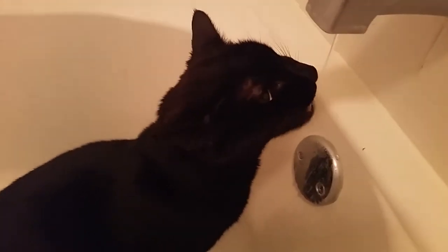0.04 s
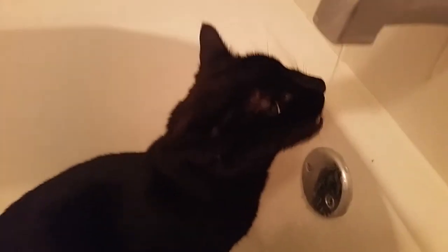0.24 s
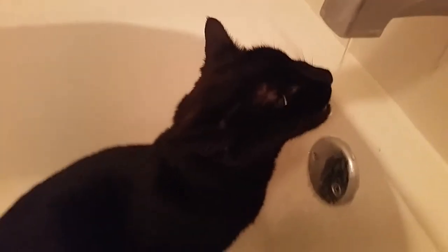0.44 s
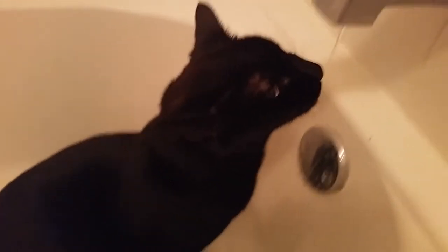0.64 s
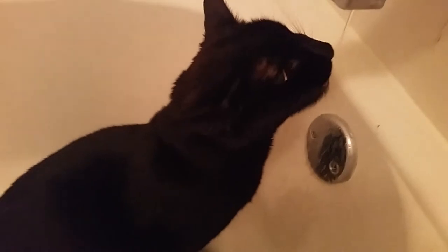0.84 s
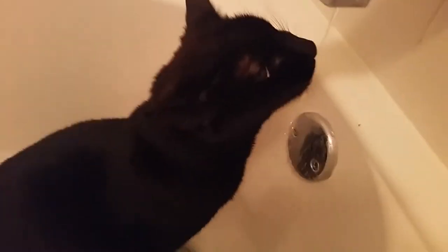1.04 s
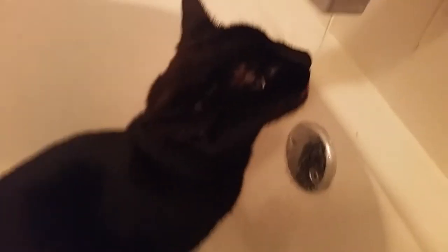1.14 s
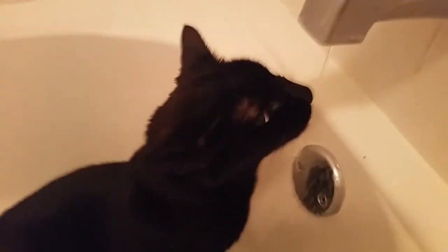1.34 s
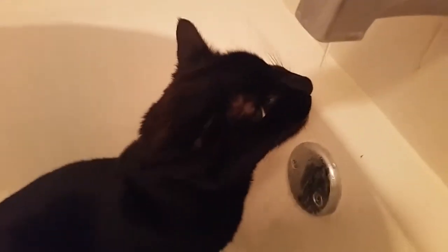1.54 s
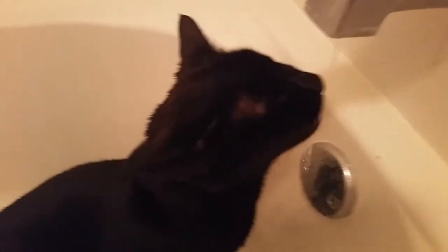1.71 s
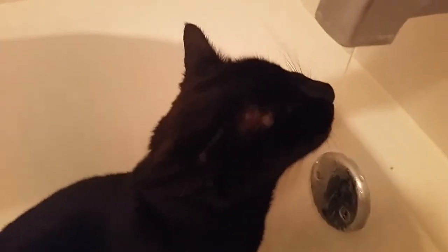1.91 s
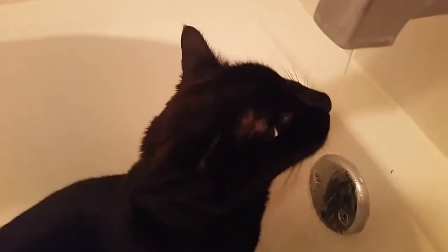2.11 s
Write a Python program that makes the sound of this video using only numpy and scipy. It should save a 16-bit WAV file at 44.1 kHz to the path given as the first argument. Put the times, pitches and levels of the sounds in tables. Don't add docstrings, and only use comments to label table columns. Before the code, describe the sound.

A cat's tongue laps at a thin trickle in a bathroom, amid heavy handling thumps and scrapes

```python
import sys
import numpy as np
from scipy import signal
from scipy.fft import rfft, irfft
from scipy.io import wavfile
from scipy.ndimage import uniform_filter1d

SR = 44100
rng = np.random.default_rng(int(sys.argv[2]) if len(sys.argv) > 2 else 0)


def volts(x):
    e = np.asarray(x, float) / 20
    return 10 ** e


def wav_out(sig):
    wavfile.write(sys.argv[1], SR, np.round(np.clip(np.atleast_2d(sig).T, -1, 1) * 32767).astype(np.int16))


N = 97020


def evened(x):
    return x / np.sqrt(np.mean(x ** 2) + 1e-20)


def read(points, hz):
    f, value = np.transpose(points)
    return np.interp(np.log(hz + 1), np.log(f + 1), value)


def add(mix, s, sound):
    part = mix[..., round(s * SR):][..., :sound.shape[-1]]
    part += sound[..., :part.shape[-1]]


def colour(x, points):
    hz = np.fft.rfftfreq(len(x), 1 / SR)
    return irfft(rfft(x) * volts(read(points, hz)), len(x))


def sides(pan_db):
    return volts(np.array([[pan_db / 2], [-pan_db / 2]]))


def ports(x):
    # hz, level_db
    left_colour = [(2000, -5.5), (3600, -13.5), (5200, -15.5), (7100, -3), (9400, -11.5), (11500, -9),
                   (14600, -13)]
    # hz, level_db
    right_colour = [(2000, -8), (3600, -11.5), (5200, -10), (7100, -6), (9400, -12), (12000, 1),
                    (14600, -13)]
    # hz, level_db
    treble_edge = [(14900, -45)]
    patch_db = 3.5
    left = colour(x[0], left_colour + treble_edge)
    right = colour(x[1], right_colour + treble_edge)
    z = signal.stft(np.array([left, right]), nperseg=256)[2]
    patches = uniform_filter1d(rng.standard_normal(z.shape[1:]), size=6, axis=0)
    patches = evened(uniform_filter1d(patches, size=9, axis=1))
    return signal.istft(z * volts(patch_db * patches), nperseg=256)[1][:, :N]


def floor():
    # hz, level_db (per Hz)
    tone_spectrum = [(24, -8.5), (40, 10.5), (82, 0), (961, -26), (1780, -36), (4000, -46), (5200, -84),
                     (8800, -120)]
    tone_db, tone_pan_db, trickle_db, waver_db = -48, 5, -61.5, 1.5
    raw = rng.standard_normal((6, N))
    waver = volts(waver_db * evened(uniform_filter1d(raw[2:4], size=2500, axis=1)))
    tone = evened(np.array([colour(raw[0], tone_spectrum), colour(raw[1], tone_spectrum)]))
    trickle = ports(raw[4:])
    return waver * (volts(tone_db) * sides(tone_pan_db) * tone + volts(trickle_db) * trickle)


def swishes():
    # start_s, length_s, level_db, pitch_hz, left_right_db
    brushes = [
        (0.048, 0.028, -53.5, 1270, 0),
        (0.425, 0.068, -55, 1770, 11),
        (0.84, 0.097, -53, 2200, 5),
        (0.96, 0.089, -58.5, 2640, -7),
        (0.76, .13, -56.5, 2260, 10.5),
        (1.5, .04, -64, 5600, 5),
        (1.5, 0.131, -67.5, 2200, 4),
        (2.052, 0.07, -57.5, 4400, 10),
    ]
    out = np.zeros((2, N))
    for s, length, db, hz, pan_db in brushes:
        t = np.arange(0, length, 1 / SR)
        peak = signal.iirpeak(hz, 2.25, SR)
        raw = rng.standard_normal((3, 6000))[:, :len(t)]
        hiss = raw[:2] + 0.18 * raw[2]
        hiss = evened(signal.lfilter(*peak, signal.lfilter(*peak, hiss)))
        swell = np.sin(np.pi * (t / length) ** 0.31)
        add(out, s, volts(db) * sides(pan_db) * swell * hiss)
    return out


def bathroom(x):
    # hz, t60_s
    tile_decay = [(3500, 0.47), (7000, 0.35), (13000, 0.24)]
    taps = rng.standard_normal((2, SR // 2)) * (np.arange(SR // 2) > 130)
    hz, t, z = signal.stft(taps, SR, nperseg=256)
    fall = volts(-60 * t / read(tile_decay, hz)[:, None])
    tail = signal.istft(z * fall, SR, nperseg=256)[1]
    return signal.fftconvolve(x, tail / np.linalg.norm(tail[0]), axes=1)[:, :N]


def spatter():
    # start_s, length_s, level_db, left_right_db
    bursts = [(0.069, 0.16, -58, 4), (0.837, 0.11, -59.5, 9), (0.257, 0.17, -56, 3), (0.413, 0.068, -53, 6),
              (0.461, 0.093, -50.5, 2), (0.524, 0.19, -54.5, -0.5), (0.663, 0.12, -56, 6.5),
              (0.956, 0.06, -52, 3.5), (0.981, 0.095, -48.5, 4), (1.07, 0.032, -45, -5),
              (1.135, 0.09, -50, 7), (1.162, 0.1, -49, -4), (1.267, 0.13, -51, -3),
              (1.342, 0.097, -51.5, 5.5), (1.677, 0.099, -55.5, -0.5), (1.852, 0.11, -59.5, 3),
              (2.039, 0.063, -54, 1.5)]
    drops_per_s, drop_spread_db, fall_db, mist_db = 480, 0.5, -14.5, 2
    rise_s, end_s = 0.012, 0.0048
    envelope = np.zeros((2, N))
    for s, length, db, pan_db in bursts:
        t = np.arange(0, length, 1 / SR)
        fade = np.clip(np.minimum(t / rise_s, (length - t) / end_s), 0, 1)
        add(envelope, s, sides(pan_db) * volts(db + fall_db * t / length) * fade)
    sizes = volts(drop_spread_db * np.minimum(rng.exponential(1, N), 4))
    drops = sizes * (rng.random(N) < drops_per_s / SR)
    drops = signal.lfilter([1], [1, -.9], drops) * rng.standard_normal((2, N))
    mist = rng.standard_normal((2, N))
    return ports(envelope * (evened(drops) + volts(mist_db) * mist)) * 2


def clicks():
    # start_s, peak_db, pitch_hz
    wet_clicks = [(0.0776, -36, 10860), (0.1303, -49, 3600), (0.2312, -51.5, 3540), (0.2708, -44, 6600),
                  (0.3445, -30.5, 11900), (0.4688, -44, 6740), (0.6752, -40, 6630), (0.8322, -42.5, 6600),
                  (0.9957, -32, 7100), (1.1738, -32.5, 6570), (1.3204, -27.5, 11700),
                  (1.3399, -32.5, 10400), (1.6602, -41, 12100), (1.687, -37, 7250), (1.924, -51.5, 3570),
                  (2.0108, -51, 3570), (2.0248, -49, 3400), (2.055, -48.5, 4840), (2.167, -54, 3460),
                  (.0468, -46, 12700), (.0772, -51.5, 3780), (.1325, -48.5, 7500), (0.9962, -30.5, 12000),
                  (.24, -46.5, 11000), (.298, -50, 11200), (.337, -44, 10400), (.4234, -39, 10500),
                  (.5307, -42, 7200), (.607, -57, 12100), (.636, -41, 11200), (.8609, -53, 3260),
                  (.9542, -43.5, 6700), (.9727, -44, 12100), (1.0794, -52, 11100), (1.5848, -55, 7250),
                  (1.651, -45, 12200), (1.6851, -37, 11300), (1.8687, -51, 5900), (1.888, -49, 5600),
                  (.9462, -48, 6830), (1.935, -49, 12400), (2.023, -49, 7200)]
    cycles, gain_db, tick_db, tick_s = 4.5, 3.5, -20, 0.0008
    right_above_hz = 9500
    out = np.zeros((2, N))
    for s, db, hz in wet_clicks:
        u = np.arange(0, 4 * cycles / hz, 1 / SR) * hz
        ring = np.sin(2 * np.pi * u * (1 + 0.0013 * u))
        bubble = np.minimum(u / 2, 1) * np.exp(-u / cycles) * ring
        n = min(len(u), 300)
        bubble[:n] += volts(tick_db) * rng.standard_normal(n) * np.exp(-np.arange(n) / (tick_s * SR))
        pan_db = np.clip((right_above_hz - hz) / 600, -5, 1)
        add(out, s, volts(db + gain_db) * sides(pan_db) * bubble)
    return out


def plops():
    # start_s, peak_db, pitch_hz, left_right_db; at 1.2487 s the case rings on the left with the snap
    dull_plops = [(0.049, -40.5, 1320, 6), (0.0784, -49, 1660, 5), (0.2391, -39.5, 543, 4),
                  (0.3459, -43, 573, 16), (0.678, -38.5, 1460, 4), (.9735, -38.5, 1470, 6),
                  (1.1455, -31.5, 636, 12.5), (1.2487, -27, 950, 18), (1.577, -51, 716, 12),
                  (1.6606, -43, 1350, 8), (1.6862, -45.5, 1370, 11), (1.709, -46.5, 770, 16),
                  (1.8424, -42.5, 527, -1), (1.89, -53, 2600, 4), (1.923, -46.5, 530, -3),
                  (2.0301, -45.5, 710, 4), (2.1645, -44.5, 487, -7)]
    cycles = 0.64
    out = np.zeros((2, N))
    for s, db, hz, pan_db in dull_plops:
        u = np.arange(0, 8 * cycles / hz, 1 / SR) * hz
        swell = u / cycles * np.exp(1 - u / cycles)
        add(out, s, volts(db) * sides(pan_db) * swell * np.sin(2 * np.pi * u))
    return out


def squeaks():
    # start_s, length_s, level_db, from_hz, to_hz
    slides = [
        (0.427, .05, -31, 362.6, 447),
        (0.427, 0.0403, -40.5, 962, 1283),
    ]
    out = np.zeros((2, N))
    for s, length, db, from_hz, to_hz in slides:
        u = np.arange(0, length, 1 / SR) / length
        wobble = evened(uniform_filter1d(rng.standard_normal(3000), size=150))[:len(u)]
        hz = (from_hz + (to_hz - from_hz) * u) * (1 + .06 * wobble)
        turns = np.cumsum(hz) / SR
        add(out[0], s, volts(db) * np.sqrt(np.sin(np.pi * u)) * np.sin(2 * np.pi * turns))
    return out


def case_taps():
    # start_s, peak_db
    case_knocks = [
        (0.1997, -19.5),
        (0.237, -35.5),
        (0.9938, -21),
    ]
    # hz, level_db, t60_s
    case_modes = [(233, -3.5, 0.13), (1080, -11.5, 0.026), (2098, -11.5, 0.011)]
    out, t = np.zeros((2, N)), np.arange(6000) / SR
    ring = sum(volts(db - 60 * t / t60) * np.sin(2 * np.pi * hz * t) for hz, db, t60 in case_modes)
    for s, db in case_knocks:
        add(out, s, volts(db) * np.array([[-1], [.3]]) * ring)
    return out


def crack():
    start_s, peak_db, cavity_hz, left_db = 1.2485, -13, 12400, -24
    out, u = np.zeros((2, N)), np.arange(60) / SR * cavity_hz
    ring = np.exp(-u / 2.5) * -np.cos(2 * np.pi * u)
    add(out, start_s, volts(peak_db) * volts([[left_db], [0]]) * ring)
    return out


def drags(table):
    edge_s, lumps_db, lump_s, skin_hz, skin_bump_db = 0.021, 2, 0.0051, 1650, 3.5
    out, raw = np.zeros(N), rng.standard_normal((2, N + SR))
    lump = round(lump_s * SR)
    lumps = evened(uniform_filter1d(uniform_filter1d(raw[1], lump), lump))
    skin = signal.cheby1(2, skin_bump_db, skin_hz, fs=SR)
    slips = signal.lfilter(*skin, raw[0] * volts(lumps_db * lumps))
    for s, length, db, speed in table:
        t = np.arange(-edge_s / 2, length + edge_s, 1 / SR)
        start = max(s + t[0], 0)
        part = slips[round(start * SR):][:len(t)]
        r = np.exp(-2 * np.pi * speed / SR)
        body = evened(signal.lfilter([1], [1, -r], signal.lfilter([1], [1, -r], part)))
        shape = np.clip(np.minimum(t - t[0], (t[-1] - t) / 2) / edge_s, 0, 1)
        add(out, start, volts(db) * np.sin(np.pi / 2 * shape) ** 2 * body)
    return out


def rubbing():
    # start_s, length_s, level_db, corner_hz
    left_drags = [(0, 0.058, -35, 57), (.19, 0.09, -42.5, 110), (.42, 0.056, -36.5, 670),
                  (.48, 0.12, -41.5, 325), (.625, 0.089, -36.5, 530), (.695, 0.031, -27.5, 250),
                  (.712, 0.043, -28.5, 460), (.75, 0.027, -36, 530), (.785, 0.033, -39.5, 190),
                  (.82, 0.13, -45, 2300), (.975, 0.019, -26.5, 490), (1.01, 0.061, -39, 113),
                  (1.08, 0.093, -33, 200), (1.14, 0.16, -34.5, 142), (1.265, 0.046, -26, 410),
                  (1.305, 0.024, -36, 570), (1.335, 0.027, -30, 480), (1.362, 0.043, -27.5, 470),
                  (1.41, .025, -34, 330), (1.45, 0.068, -34.5, 216), (1.52, 0.23, -45, 297),
                  (1.705, 0.058, -37, 224), (1.765, 0.064, -42, 250), (1.835, 0.037, -38, 226),
                  (1.95, 0.17, -52.5, 73), (2.15, 0.073, -35.5, 46)]
    # start_s, length_s, level_db, corner_hz
    right_drags = [(0, 0.16, -42, 97), (.23, 0.2, -37, 101), (.43, 0.041, -37.5, 210),
                   (.48, 0.21, -38.5, 153), (.68, 0.06, -28, 74), (.75, 0.087, -32, 87),
                   (.85, 0.17, -41, 150), (.97, 0.079, -34.5, 94), (1.08, 0.053, -34, 135),
                   (1.3, 0.053, -35, 240), (1.355, 0.053, -52, 1300), (1.46, 0.066, -48, 160),
                   (1.83, 0.084, -55, 340), (2.155, 0.042, -50, 76)]
    leak_db = -36
    rub = np.array([drags(left_drags), drags(right_drags)])
    return rub + volts(leak_db) * rub[::-1]


def knocks(table):
    out = np.zeros(N)
    for s, db, rise_ms in table:
        u = np.arange(0, 12 * rise_ms / 1000, 1 / SR) * 1000 / rise_ms
        add(out, s, volts(db) * (u * np.exp(1 - u)) ** 2)
    return out


def pumping():
    # start_s, peak_db, rise_ms
    left_pushes = [(.192, -20, 0.79), (.1998, -12, 0.75), (.4205, -20.5, 0.57), (.6205, -6.5, 1.24),
                   (.9932, -6.5, 0.75), (1.001, -4, 6.9), (1.109, -13.5, 1.08), (.693, -20, 1.8),
                   (.722, -12.5, 1.1), (.762, -19, 4.2), (1.2822, -14, 0.68), (1.334, -22, .8),
                   (1.383, -13.5, 1.1)]
    # start_s, peak_db, rise_ms
    left_pulls = [(.4192, -12, 0.75), (.4262, -16, 1.24), (.91, -17.5, 3.6), (1.0798, -22.5, 0.71),
                  (.6895, -20, 1.8), (.7268, -20, 0.75), (.7675, -23.5, 1.36), (.773, -15.5, 3.1),
                  (.808, -20.5, 2.2), (1.2765, -11.5, 1.24), (1.2843, -13, 0.62), (1.2957, -9, 1.15),
                  (1.3405, -17, 1.3), (1.3797, -14, 0.73), (1.392, -14.5, 0.78), (1.4062, -16.5, 1)]
    # start_s, peak_db, rise_ms
    right_pushes = [
        (.4, -20.5, 2.3),
        (.4203, -12, 1.6),
        (.967, -12.5, 1.55),
        (1.0798, -15, 1.5),
        (1.158, -27, 0.6),
        (1.472, -29.5, 1.2),
        (2.165, -29, 1.54),
    ]
    # start_s, peak_db, rise_ms
    right_pulls = [
        (.2, -15, 1.4),
        (.359, -7.5, 9.2),
        (.9933, -18, 0.42),
        (1.162, -12.5, 1.4),
        (1.3055, -34, 0.93),
        (1.321, -20, 0.82),
        (1.3303, -18, 0.62),
    ]
    # start_s, peak_db, rise_ms
    snap_out = [
        (1.2483, -5, 0.38),
    ]
    # start_s, peak_db, rise_ms
    snap_in = [
        (1.2494, -4.5, 1.46),
    ]
    left = knocks(left_pushes) - knocks(left_pulls)
    right = knocks(right_pushes + snap_in) - knocks(right_pulls + snap_out)
    return np.array([left, right])


def vent(x):
    leak_hz = (84.2, 27)
    leak_q = (0.96, 1)
    for hz, q in zip(leak_hz, leak_q):
        w = 2 * np.pi * hz / SR
        c, a = np.cos(w), np.sin(w) / (2 * q)
        x = signal.lfilter([(1 + c) / 2, -1 - c, (1 + c) / 2], [1 + a, -2 * c, 1 - a], x)
    return x


def scene():
    room_db = -6
    water = clicks() + spatter()
    basin = water + volts(room_db) * bathroom(water) + plops()
    fingers = vent(pumping() + rubbing()) + squeaks() + case_taps() + crack()
    return floor() + swishes() + basin + fingers


def roll_off(x):
    return signal.sosfilt(signal.butter(12, 15810, fs=SR, output="sos"), x)


def record(dry):
    lowpass = signal.firwin(255, 15700, fs=SR)
    limited = signal.oaconvolve(dry, lowpass[None], "same", axes=1)
    return roll_off(limited)


dry = scene()
out = record(dry)
wav_out(out)
```